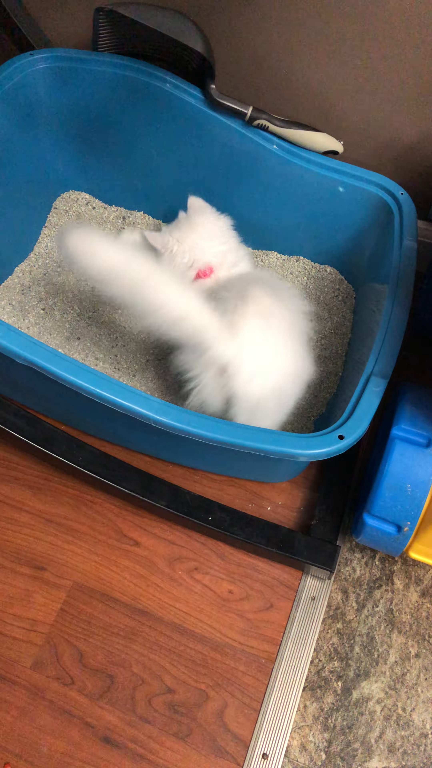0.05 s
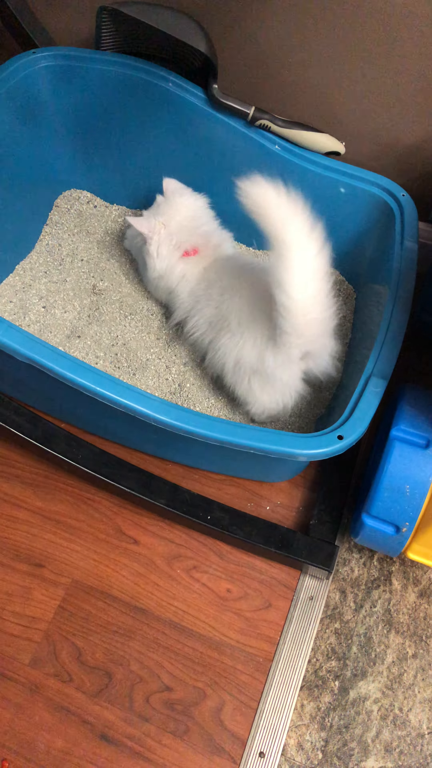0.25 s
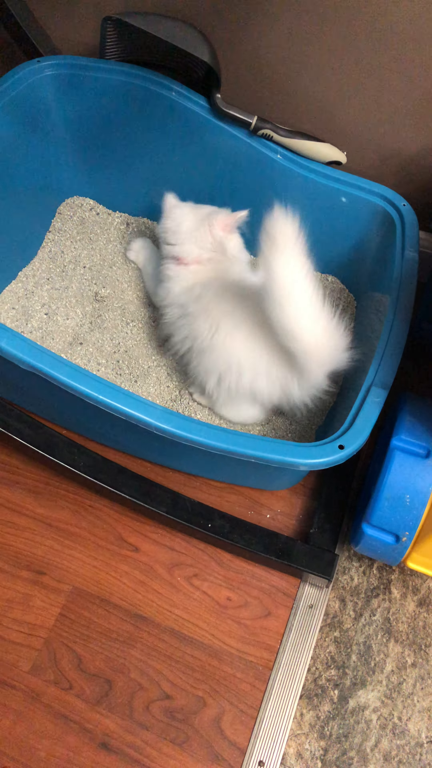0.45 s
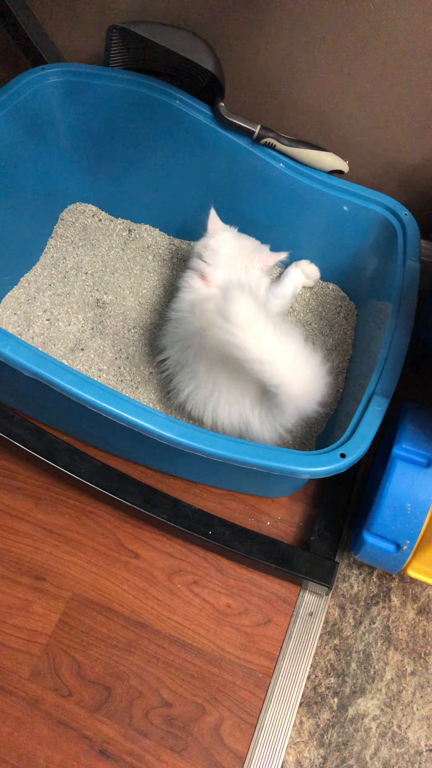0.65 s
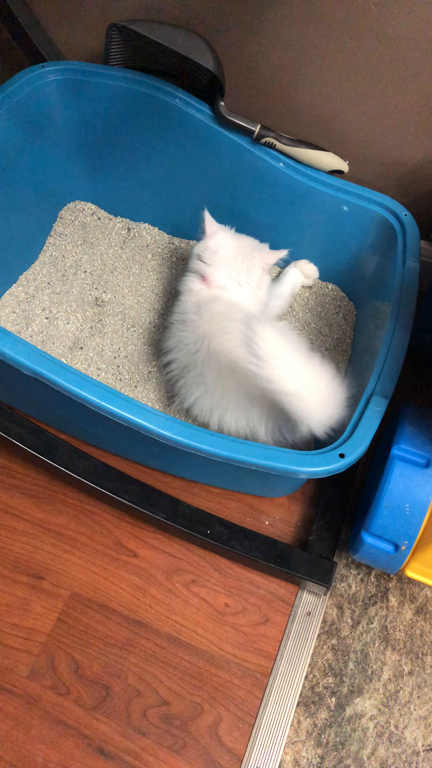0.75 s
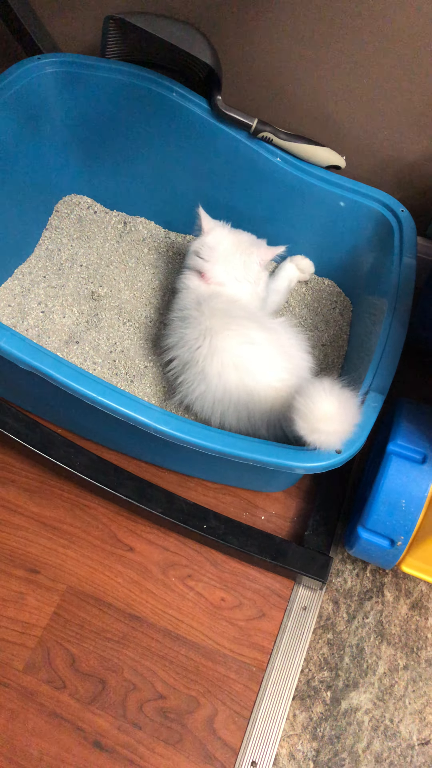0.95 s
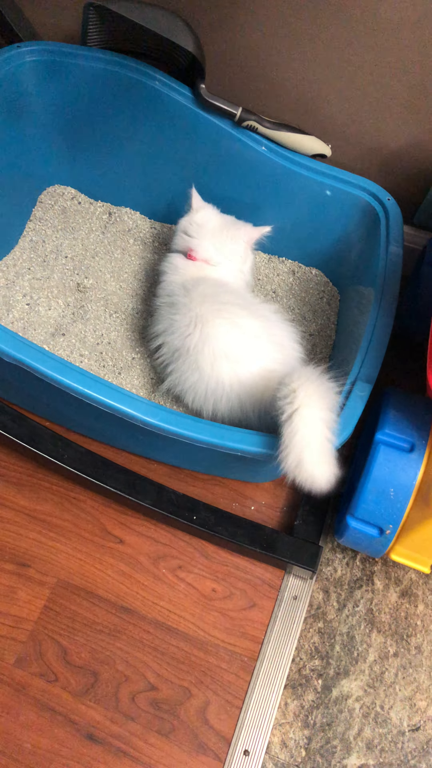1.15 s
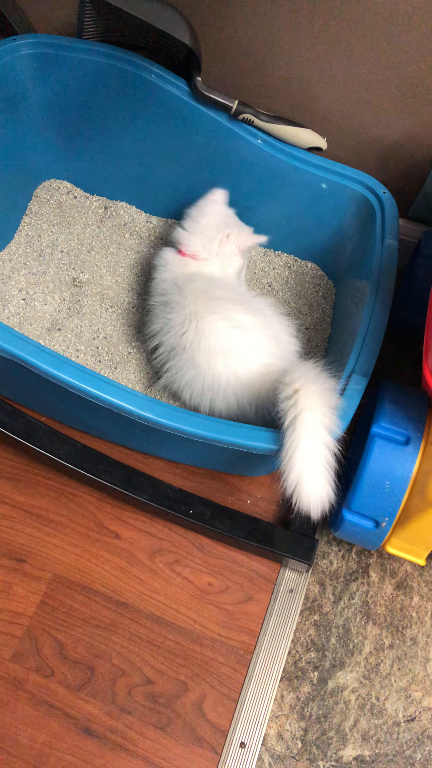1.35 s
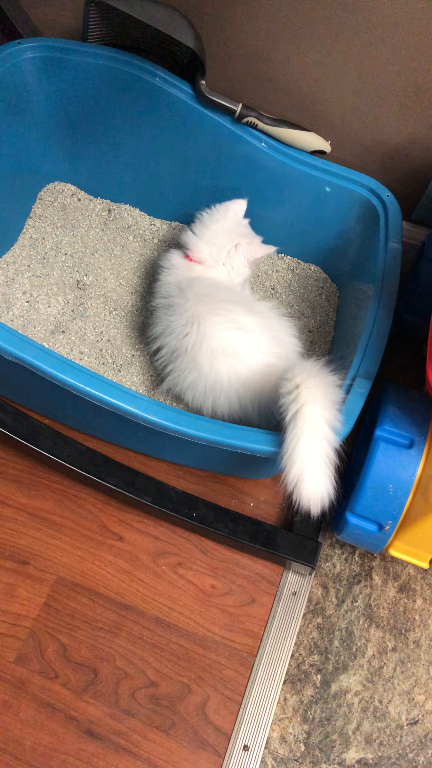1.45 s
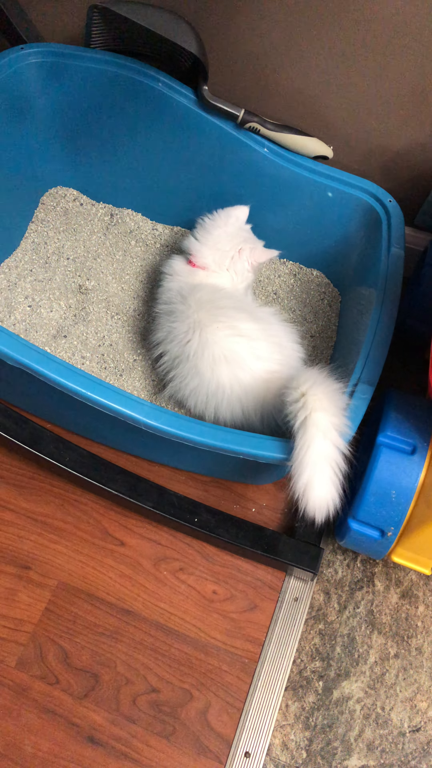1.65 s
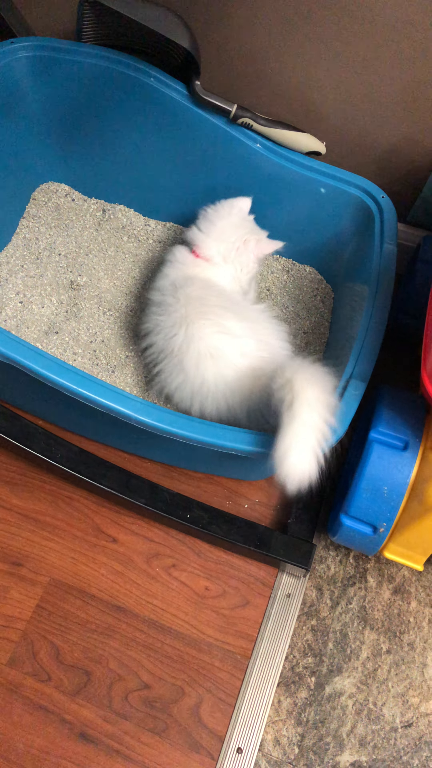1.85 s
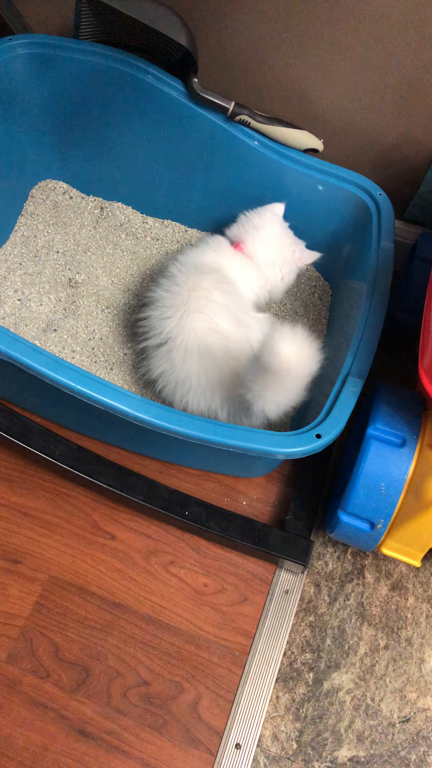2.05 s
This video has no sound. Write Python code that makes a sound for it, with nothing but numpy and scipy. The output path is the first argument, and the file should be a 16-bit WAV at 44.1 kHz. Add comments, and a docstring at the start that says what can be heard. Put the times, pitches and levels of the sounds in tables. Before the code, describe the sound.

A kitten scrambles in a plastic litter box, scratching and scattering gritty litter in two quick bursts

```python
"""In a small, humming room, a kitten scrambles in a plastic litter box.
Bursts of noise with ringing tub tones make its claw catches; a falling tone with a noisy crunch makes
the paw strike. Showers of random grains make the sprays and drags, and short high tones the snaps.
Then it settles: soft steps are short low tones, faint rustles are filtered grains.
A tiny metal piece, perhaps on its collar, tinkles as very narrow bands of noise. A hum and air run below."""
import sys
import numpy as np
from scipy import signal
from scipy.fft import rfft, irfft
from scipy.io import wavfile

SR = 44100
rng = np.random.default_rng(int(sys.argv[2]) if len(sys.argv) > 2 else 0)


def inscribe(sig):
    """Save sig as 16-bit PCM at rate SR to the path in sys.argv[1].

    A 1-D sig is mono; a 2-D sig holds one channel per row.
    Samples are clipped to [-1, 1] before scaling.
    """
    pcm = np.round(np.clip(np.atleast_2d(sig).T, -1, 1) * 32767)
    wavfile.write(sys.argv[1], SR, pcm.astype(np.int16))


N = 92610  # samples, 2.1 s

# hum of an appliance: pitch_hz, level_db, unsteadiness (ratio to the pure tone)
HUM_TONES = [(57.9, -61, 1.1), (120.2, -57.5, 0.22), (185.2, -64, 0.18), (324.1, -63.5, 1.8)]
# spectrum of the rushing air: frequency_hz, relative_level_db
AIR_SPECTRUM = [(20, -64), (40, -25), (55, -19.5), (90, 0.5), (150, -6), (330, -2), (480, -7), (700, -13.5),
                (1200, -17.5), (2200, -26.5), (4500, -28), (9000, -37.5), (16000, -49)]
# soft steps and bumps against the tub: peak_s, level_db, pitch_hz
SOFT_STEPS = [(0.241, -44.5, 330), (0.63, -53, 292), (0.837, -47.5, 217), (0.874, -46.5, 71),
              (1.697, -45.5, 98), (1.731, -45.5, 87), (1.815, -43, 79.6), (2.06, -45, 66)]
# collar tinkles: peak_s, level_db, pitch_hz, width_octaves, fall_s
METAL_TINKLES = [(0.713, -50, 14000, 0.011, 0.013), (1.158, -76, 13850, .015, .025),
                 (1.205, -59, 13900, .035, 0.0046), (2.032, -67, 14200, .025, .005)]
# half-squeaky brushing along the tub: peak_s, rise_s, fall_s, level_db, centre_hz, width_octaves
TUB_BRUSHES = [(1.231, 0.016, 0.034, -62, 4470, 0.28), (1.243, .014, 0.043, -64, 4130, 0.03),
               (1.33, 0.0082, .02, -59, 4950, 0.17), (1.358, .012, 0.057, -66.5, 5100, 0.12),
               (1.495, 0.04, 0.032, -73, 5060, 0.18)]
# stray grains landing: peak_s, level_db, brightness_db_per_octave
STRAY_GRAINS = [(0.701, -46, -4.5), (0.7326, -49, -3), (0.757, -49, -0.5), (0.79, -56, -8),
                (0.821, -53.5, -5.5), (1.128, -55.5, -4.5), (1.328, -56.5, -6)]
# paws dragging through the litter: start_s, length_s, level_db, brightness_db_per_octave
PAW_DRAGS = [(0.07, 0.046, -56.5, -0.5), (0.139, 0.11, -52.5, 0), (0.472, 0.092, -50.5, -1),
             (0.579, 0.14, -57, -2.5), (0.868, 0.049, -55, -7.5), (0.97, 0.076, -69, -3.5),
             (1.055, 0.11, -59, -7.5), (1.185, 0.17, -66.5, -2.5), (1.646, .075, -66.5, 6.5),
             (1.674, 0.032, -58.5, -7.5), (1.808, 0.35, -69.5, 3), (1.925, 0.11, -66.5, 1.5)]
# spectrum of dragged litter: frequency_hz, relative_level_db
DRAG_SPECTRUM = [(100, 1.5), (400, -6.5), (900, -0.5), (1800, 1.5), (3000, -0.5), (5500, -4.5),
                 (8000, -9.5), (16000, -20)]
# kicked litter: peak_s, rise_s, fall_s, level_db (rise and fall: times between the peak and 1/e of it)
LITTER_SPRAYS = [(0.2256, 0.0071, 0.011, -31.5), (.242, .003, 0.0069, -46), (0.259, 0.012, 0.016, -44),
                 (0.317, 0.017, 0.021, -42), (0.367, 0.013, 0.013, -46.5), (.636, 0.038, 0.012, -51),
                 (.675, 0.021, 0.064, -55.5), (1.185, 0.084, 0.035, -67), (1.54, 0.047, 0.037, -71.5)]
# spectrum of sprayed litter: frequency_hz, relative_level_db
SPRAY_SPECTRUM = [(100, -18), (500, -5), (1500, -4.5), (2300, -5), (3400, 1.5), (5200, -1.5), (7800, 2.5),
                  (10000, -1.5), (16000, -1)]
# single grains cracking under the paws: start_s, level_db (before the fade), pitch_hz
GRAIN_SNAPS = [(.2048, -38, 3920), (.2212, -36, 3370), (.2265, -27, 3300), (0.2283, -25, 7200),
               (0.2398, -29, 6500), (.3088, -23.5, 7650), (.3175, -47, 7260), (0.322, -36, 4130),
               (0.3307, -33, 1350), (0.3452, -28.5, 3570), (0.3482, -29.5, 3550), (.3622, -28, 5250),
               (0.5936, -25, 4490), (0.6163, -34, 3660), (0.6567, -35, 1910), (0.6668, -34, 2840),
               (2.033, -47, 1540)]
# claws catching the tub: time_s, tick_db, crumble_db, knock_db, brightness_db_per_octave
CLAW_CATCHES = [(0.2044, -37.5, -38.5, -49.5, -3), (0.2145, -31.5, -41, -45, 3),
                (0.2622, -29, -50, -59, 1.5), (0.309, -31, -45.5, -45, -2.5),
                (0.3295, -28.5, -48, -59, -1.5), (0.346, -35, -55, -76, -1), (0.3616, -33.5, -48, -55, -1),
                (0.3657, -33.5, -47, -74, 1), (0.3788, -38, -58, -67, -3), (0.5937, -31, -37, -45, -3.5),
                (.6168, -28.5, -46, -43.5, -1), (0.6313, -37, -41, -72, -2.5),
                (0.6566, -34.5, -43, -53, -1.5), (0.6663, -31.5, -51, -39.5, -1),
                (2.034, -58, -57, -52.5, -4.5)]
# spectrum of claw ticks, crumbles and stray grains: frequency_hz, relative_level_db
CLAW_SPECTRUM = [(100, -27), (500, -8), (1200, -5), (2300, -3.5), (3800, 3), (6000, 1), (10000, 0),
                 (16000, -1)]
# spectrum of the dry knock on the tub: frequency_hz, relative_level_db
KNOCK_SPECTRUM = [(100, 1), (400, -5.5), (700, -3.5), (1400, 7.5), (2300, -5.5), (4000, -7), (16000, -21)]
# ringing tones of the plastic tub: pitch_hz, relative_level_db, t60_s (time to fall by 60 dB)
TUB_MODES = [(317, -2, 0.086), (597, -15, 0.04), (642, -2, 0.17), (726, -11, 0.14), (1020, -1, 0.077),
             (1605, -2, 0.092)]

AIR_DB, AIR_SWELL_DB, AIR_SWELL_HZ, HUM_WAVER_HZ = -56.5, 1.25, 17.5, 7.8
STEP_S = 0.0063
BRUSH_GRAINS_PER_S, DRAG_GRAINS_PER_S, SPRAY_GRAINS_PER_S = 2900, 22000, 16000
GRAIN_SPREAD_DB = 2
STRAY_FALL_S = 0.0038
DRAG_RISE_S, DRAG_FALL_S = 0.023, 0.03
SPRAY_CLUMP_DB, SPRAY_CLUMP_HZ = 0.7, 220
SNAP_CYCLES = 1.8  # pitch cycles in which a snap falls to 1/e
POUNCE_S, POUNCE_DB, POUNCE_FALL_S = 0.597, -36, 0.0058
POUNCE_FROM_HZ, POUNCE_TO_HZ, POUNCE_GLIDE_S = 1100, 331, 0.00427
CLAW_FALL_S, CRUMBLE_S, KNOCK_FALL_S, RING_DB = 0.0013, 0.005, 0.0031, -9
ROOM_DB, ROOM_T60_S, ROOM_DULL_HZ = -15.5, 0.42, 9350
WALL_DB, WALL_S = -10.5, 0.01
START_S, BASS_ENTRY_S, BASS_HZ = 0.0844, 0.26, 160
LOW_CUT_HZ, EDGE_HZ = 49, 15900


def amp(db):
    """Turns decibels into gain."""
    return 10 ** (np.asarray(db) / 20)


def unit(x):
    """Scales x to an average strength (rms) of 1."""
    return x / np.sqrt(np.mean(x ** 2) + 1e-20)


def since(s):
    """Seconds from the moment s, for every sample."""
    return np.arange(N) / SR - s


def swell(s, rise, fall):
    """Grows exponentially up to the moment s and dies away after it."""
    t = since(s)
    return np.exp(np.where(t < 0, t / max(rise, 1e-5), -t / max(fall, 1e-5)))


def colour(x, points, tilt_db=0):
    """Shapes the spectrum of x, tilted by so many dB per octave; rms 1."""
    octave = np.log2(np.fft.rfftfreq(N, 1 / SR) + 1)
    hz, db = np.transpose(points)
    # the tilt is flat below the second point
    slope = tilt_db * np.maximum(octave, np.log2(hz[1]))
    gain = amp(np.interp(octave, np.log2(hz), db) + slope)
    return unit(irfft(rfft(x) * gain, N))


def band(x, hz, octaves):
    """Keeps one bell-shaped band of x; rms 1."""
    away = np.log2((np.fft.rfftfreq(N, 1 / SR) + 1) / hz) / octaves
    return unit(irfft(rfft(x) * np.exp(-0.5 * away ** 2), N))


def noise():
    """White noise: a steady hiss."""
    return rng.standard_normal(N)


def grains(per_s):
    """Random tiny collisions, a few much larger than the rest."""
    size = amp(GRAIN_SPREAD_DB * np.minimum(rng.exponential(1, N), 4))
    direction = rng.choice([-1., 1.], N)
    hits = rng.random(N) < per_s / SR
    return size * direction * hits


def appliance():
    """A wavering hum over a gently swelling rush of air."""
    air_db = AIR_DB + AIR_SWELL_DB * band(noise(), AIR_SWELL_HZ, 0.96)
    out = amp(air_db) * colour(noise(), AIR_SPECTRUM)
    for hz, db, waver in HUM_TONES:
        tone = np.sqrt(2) * np.sin(2 * np.pi * (hz * since(0) + rng.random()))
        # narrow noise around the tone makes it waver
        unsteady = waver * band(noise(), hz, HUM_WAVER_HZ / hz)
        out += amp(db) * unit(tone + unsteady)
    return out


def room(x):
    """Quick reflections from the tub walls, then the short, duller tail of the room."""
    t = np.arange(SR // 2) / SR
    # about one sample in ten carries an echo
    wall, tail = rng.standard_normal((2, len(t))) * (rng.random((2, len(t))) < 0.1)
    wall = wall * np.exp(-t / WALL_S) * (t > 0.001)
    tail = tail * amp(-60 * t / ROOM_T60_S) * (t > 0.006)
    tail = signal.lfilter(*signal.butter(1, min(ROOM_DULL_HZ, SR / 2 - 1), fs=SR), tail)
    echo = amp(WALL_DB) * wall / np.linalg.norm(wall) + amp(ROOM_DB) * tail / np.linalg.norm(tail)
    return x + signal.fftconvolve(x, echo)[:N]


def steps():
    """Dull thumps and bumps of the tub under shifting weight: brief low tones."""
    out = np.zeros(N)
    for s, db, hz in SOFT_STEPS:
        out += amp(db) * swell(s, STEP_S, 2 * STEP_S) * np.cos(2 * np.pi * hz * since(s))
    return out


def tinkles():
    """Very high, short rings of a tiny piece of metal."""
    out = np.zeros(N)
    for s, db, hz, width, fall in METAL_TINKLES:
        out += amp(db) * swell(s, 0.001, fall) * band(noise(), hz, width)
    return out


def brushes():
    """Thin, soft swishes as the kitten turns, some narrow enough to squeak faintly."""
    out = np.zeros(N)
    for s, rise, fall, db, hz, width in TUB_BRUSHES:
        out += amp(db) * swell(s, rise, fall) * band(grains(BRUSH_GRAINS_PER_S), hz, width)
    return out


def strays():
    """Single grains drop back onto the litter and the plastic: short bursts of noise."""
    out = np.zeros(N)
    for s, db, tilt_db in STRAY_GRAINS:
        out += amp(db) * swell(s, 0.00044, STRAY_FALL_S) * colour(noise(), CLAW_SPECTRUM, tilt_db)
    return out


def drags():
    """Grains grind together under a moving paw: a duller rustle that rises, holds and fades."""
    out = np.zeros(N)
    for s, length, db, tilt_db in PAW_DRAGS:
        t = since(s)
        rise = np.clip(t / DRAG_RISE_S, 0, 1)
        fade = np.exp(-np.maximum(t - length, 0) / DRAG_FALL_S)
        out += amp(db) * rise * fade * colour(grains(DRAG_GRAINS_PER_S), DRAG_SPECTRUM, tilt_db)
    return out


def sprays():
    """Kicked litter showers down in clumps as a dense, bright crackle."""
    flow = sum(amp(db) * swell(s, rise, fall) for s, rise, fall, db in LITTER_SPRAYS)
    clumps = unit(amp(SPRAY_CLUMP_DB * band(noise(), SPRAY_CLUMP_HZ, 0.72)))
    return flow * clumps * colour(grains(SPRAY_GRAINS_PER_S), SPRAY_SPECTRUM)


def snaps():
    """A cracking grain rings for only a few cycles."""
    out = np.zeros(N)
    for s, db, hz in GRAIN_SNAPS:
        ring = np.sin(2 * np.pi * hz * np.maximum(since(s), 0))  # silent before s
        out += amp(db) * ring * swell(s + 0.00063, 0.000069, SNAP_CYCLES / hz)
    return out


def pounce():
    """A hard paw strike crunches litter and flexes the tub floor; its knock drops quickly in pitch."""
    t = np.maximum(since(POUNCE_S), 0)
    hz = POUNCE_TO_HZ + (POUNCE_FROM_HZ - POUNCE_TO_HZ) * np.exp(-t / POUNCE_GLIDE_S)
    flex = np.sin(2 * np.pi * np.cumsum(hz) / SR)
    crunch = amp(-2) * band(noise(), 1510, 0.33)
    shape = swell(POUNCE_S + 0.0019, 0.00068, POUNCE_FALL_S)
    return amp(POUNCE_DB) * shape * (flex + crunch)


def tub_ring(s):
    """The struck plastic sounds several tones at once, each fading at its own rate."""
    t = np.maximum(since(s), 0)
    out = np.zeros(N)
    for hz, db, t60 in TUB_MODES:
        out += amp(db - 60 * t / t60) * rng.choice([-1, 1]) * np.sin(2 * np.pi * hz * t)
    return out


def claws():
    """Each catch is a sharp tick, a short crumble, and a dry knock that rings the tub."""
    out = np.zeros(N)
    for s, tick_db, crumble_db, knock_db, tilt_db in CLAW_CATCHES:
        tick = amp(tick_db) * swell(s + 0.00052, 0.0001, CLAW_FALL_S)
        crumble = amp(crumble_db) * swell(s + 0.0021, 0.00026, CRUMBLE_S)
        scrape = (tick + crumble) * colour(noise(), CLAW_SPECTRUM, tilt_db)
        knock = colour(noise(), KNOCK_SPECTRUM) * swell(s + 0.00099, 0.001, KNOCK_FALL_S)
        out += scrape + amp(knock_db) * (knock + amp(RING_DB) * tub_ring(s))
    return out


def scene():
    """The kitten in its box, and the room around it."""
    kitten = tinkles() + brushes() + strays() + drags() + sprays() + snaps() + pounce() + claws()
    return (appliance() + steps() + room(kitten))[None]


def record(dry):
    """Low cut; the sound opens after a moment of silence, the bass easing in last; steep top limit."""
    bass = signal.sosfiltfilt(signal.butter(2, BASS_HZ, fs=SR, output="sos"), dry)
    held_back = np.exp(-np.maximum(since(START_S), 0) / BASS_ENTRY_S)
    low_cut = signal.butter(4, LOW_CUT_HZ, "high", fs=SR, output="sos")
    cut = signal.sosfilt(low_cut, dry - held_back * bass)
    opened = cut * np.clip(since(START_S) / 0.0012 + 1, 0, 1)
    top_limit = signal.firwin(511, EDGE_HZ, window=("kaiser", 9), fs=SR)
    return signal.oaconvolve(opened, top_limit[None], "same")


dry = scene()
out = record(dry)
inscribe(out)
```